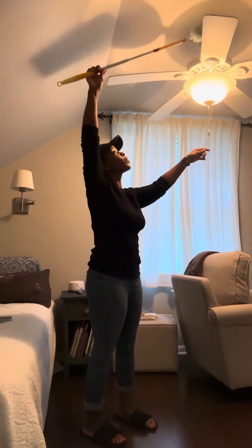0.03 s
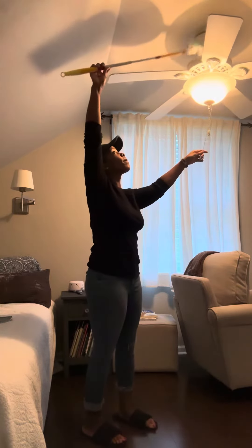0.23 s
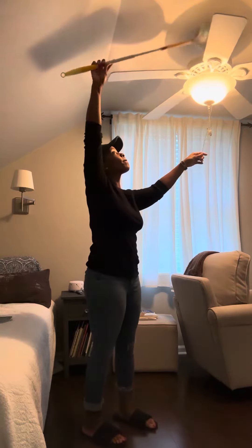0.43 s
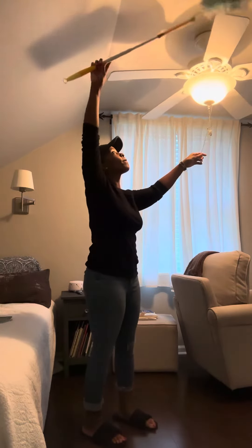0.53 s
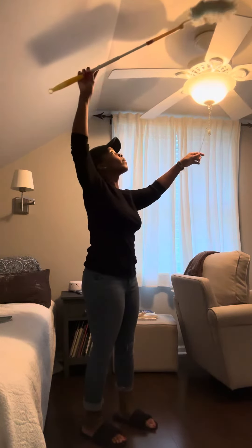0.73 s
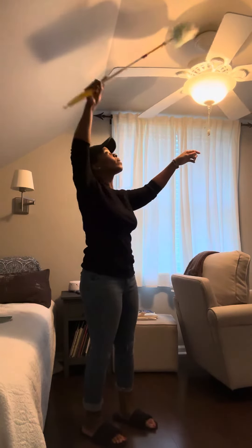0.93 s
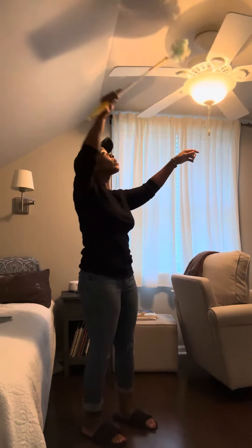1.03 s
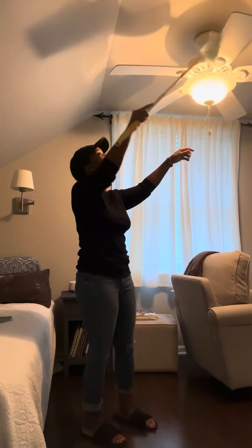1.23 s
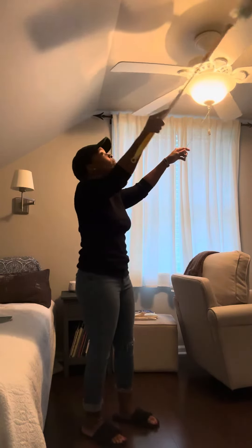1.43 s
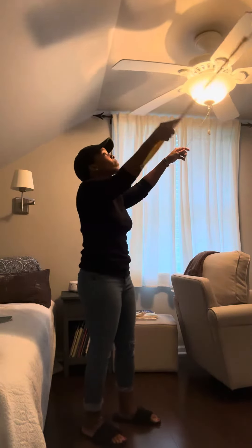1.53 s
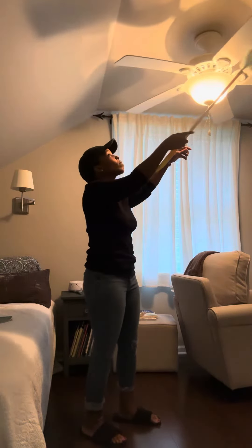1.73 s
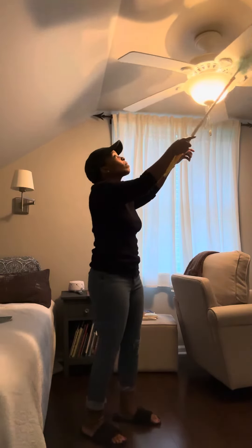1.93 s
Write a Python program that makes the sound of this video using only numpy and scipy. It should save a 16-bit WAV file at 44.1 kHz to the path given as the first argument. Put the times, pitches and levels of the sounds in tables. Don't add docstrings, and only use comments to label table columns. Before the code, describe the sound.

A hollow duster pole knocks fan blades twice early, the second a longer rattle, then a lighter tap and a late dull knock; soft brushing and ticks between, low air hum, small furnished room, stereo microphone.

```python
import sys
import numpy as np
from scipy import signal
from scipy.fft import rfft, irfft
from scipy.io import wavfile
from scipy.ndimage import uniform_filter1d

SR = 44100
rng = np.random.default_rng(int(sys.argv[2]) if len(sys.argv) > 2 else 0)


def wrap_up_sound(samples):
    columns = np.atleast_2d(samples).T
    tamed = np.clip(columns, -1, 1)
    steps = np.round(tamed * 32767).astype(np.int16)
    wavfile.write(sys.argv[1], SR, steps)


def voltage_ratio(level):
    return 10 ** (np.asarray(level, float) / 20)


N = 88200


def read(points, hz):
    f, value = np.transpose(points)
    return np.interp(np.log(hz + 1), np.log(f + 1), value)


def evened(x):
    return x / np.sqrt(np.mean(x ** 2) + 1e-20)


def colour(x, points):
    size = x.shape[-1]
    gain = voltage_ratio(read(points, np.fft.rfftfreq(size, 1 / SR)))
    return irfft(rfft(x) * gain, size)


def resonate(x, hz, width_hz):
    r = np.exp(-np.pi * width_hz / SR)
    return signal.lfilter([1 - r, 0, r - 1], [1, -2 * r * np.cos(2 * np.pi * hz / SR), r * r], x)


def resonate_twice(x, hz, width_hz):
    return resonate(resonate(x, hz, width_hz), hz, width_hz)


def add(mix, s, sound):
    part = mix[round(s * SR):][:len(sound)]
    part += sound[:len(part)]


def peaked(x, db):
    return x * voltage_ratio(db) / np.sqrt(uniform_filter1d(x ** 2, size=176).max() + 1e-20)


# (frequency [Hz], level [dB])
RUSH = [(12, -71), (20, -43.5), (48, -3.5), (124, -7), (248, -37.5), (272, -16.5), (527, -4.5), (552, 3.5),
        (800, -22.5), (1040, -43), (1760, -120)]
# (frequency [Hz], level [dB])
HISS = [(600, -5.5), (900, -0.5), (1300, -11.5), (2000, -6), (3000, -24.5), (6000, -32.5), (10000, -42),
        (16000, -43.5)]
# (frequency [Hz], width [Hz], level [dB])
DUCT = [(57.7, 31, -63), (98.8, 33, -63), (214.3, 43, -70.5), (271.4, 30, -68.5), (489.7, 33.5, -58),
        (565.4, 49, -59), (627.6, 91, -59)]
RUSH_DB, HISS_DB = -52.5, -64


def air_handling():
    rush, hiss, drive = rng.standard_normal((3, 2, N))
    air = voltage_ratio(RUSH_DB) * evened(colour(rush, RUSH)) + voltage_ratio(HISS_DB) * evened(colour(hiss, HISS))
    for hz, width_hz, db in DUCT:
        air += voltage_ratio(db) * evened(resonate_twice(drive, hz, width_hz))
    return air


# (frequency [Hz], t60 [s])
ROOM_T60 = [(200, 0.39), (1000, 0.34), (2000, 0.3), (5000, 0.26), (12000, 0.2)]
# (delay [s], level [dB])
ECHOES = [(.008, -8), (0.0117, -13), (.015, -12)]
ROOM_DB = -4
TAP_SPACING = 20
SCATTER = 300


def room(x):
    taps = np.zeros((2, SR // 2))
    slots = np.arange(200, SR // 2 - TAP_SPACING, TAP_SPACING)
    at = slots + rng.integers(0, TAP_SPACING, (2, len(slots)))
    np.put_along_axis(taps, at, rng.choice([-1., 1.], at.shape), 1)
    hz, t, z = signal.stft(taps, SR, nperseg=256)
    decay = voltage_ratio(-60 * t / read(ROOM_T60, hz)[:, None])
    tail = signal.istft(z * decay, SR, nperseg=256)[1]
    tail = voltage_ratio(ROOM_DB) * tail / np.linalg.norm(tail[0])
    tail[0, 0] += 1
    tail[1, :SCATTER] += rng.standard_normal(SCATTER) / np.sqrt(SCATTER)
    for s, db in ECHOES:
        tail[0, round(s * SR)] += voltage_ratio(db)
    fade_out = np.minimum(np.arange(N, 0, -1) / SCATTER, 1)
    return signal.fftconvolve(x[None], tail, axes=1)[:, :N] * fade_out


# (time [s], pressure level [dB], fine over coarse fibres [dB])
STROKE = [(0.199, -100, 13.5), (.27, -60, -4), (.33, -57, -2.5), (0.402, -57, -3), (0.581, -68.5, -22.5),
          (.68, -71, -10), (.85, -100, -4), (1.1, -82, -1), (1.17, -66.5, -2.5), (1.27, -67.5, 4.5),
          (1.31, -63, -1.5), (1.38, -66, -3.5), (1.44, -66.5, -4.5), (1.51, -66, -7), (1.56, -73.5, -19),
          (1.62, -71, 3), (1.679, -85, -4), (2.0, -79, 2)]
# (frequency [Hz], level [dB])
COARSE = [(800, -16.5), (1500, -1.5), (2200, 5.5), (3200, -1), (4500, -3.5), (7000, -32)]
# (frequency [Hz], level [dB])
FINE = [(2500, -10), (4200, 0), (5600, 7), (7000, 3), (10000, 0), (13500, -7), (16000, 4.5)]
SLIPS_PER_S, SLIP_SPREAD_DB = 18000, 0.5
CLUMP_DB, CLUMP_S = 3, 0.011


def brush():
    s, pressure_db, fine_db = np.transpose(STROKE)
    t, clump = np.arange(N) / SR, round(CLUMP_S * SR)
    slips = (rng.random((2, N)) < SLIPS_PER_S / SR) * rng.choice([-1., 1.], (2, N))
    slips = slips * voltage_ratio(SLIP_SPREAD_DB * rng.exponential(1, (2, N)))
    drift = uniform_filter1d(uniform_filter1d(rng.standard_normal((2, N)), clump), clump)
    clumps = voltage_ratio(CLUMP_DB * evened(drift))
    coarse = evened(colour(slips[0], COARSE)) * clumps[0]
    fine = evened(colour(slips[1], FINE)) * clumps[1]
    fibres = coarse + fine * voltage_ratio(np.interp(t, s, fine_db))
    return fibres * voltage_ratio(np.interp(t, s, pressure_db) - 4)


# (time [s], level [dB], frequency [Hz], width [Hz], length [s])
TICKS = [(.6065, -48, 5900, 756, 0.0031), (.606, -56, 4240, 2010, 0.0038),
         (.606, -64.5, 11500, 5700, 0.0024), (.606, -61, 14800, 2500, .004), (0.5, -64, 2264, 29, 0.0028),
         (0.416, -44, 4800, 3200, .003), (.44, -40.5, 2160, 44, 0.0033), (1.105, -49, 2223, 885, 0.0036),
         (1.105, -55, 3320, 1500, 0.0054), (1.108, -51.5, 8660, 2019, 0.0037),
         (1.104, -58.5, 14400, 4030, .004), (.49, -57, 2132, 29.7, 0.038),
         (.609, -71.5, 12600, 5960, 0.017), (.612, -66.5, 5640, 1520, .03),
         (.725, -73.5, 11500, 4000, 0.028), (.73, -58.5, 3570, 2480, .045),
         (1.108, -71.5, 10200, 6000, 0.036), (1.108, -67, 3000, 1500, 0.027), (1.175, -68, 5470, 1000, .05),
         (1.257, -67, 5300, 1010, 0.04), (1.365, -61, 2340, 1390, 0.035), (1.49, -62, 2570, 1600, 0.034),
         (1, -70, 3200, 2500, 0.0044), (1.1, -63, 5330, 2200, .004), (1.585, -71.5, 11200, 4980, 0.048),
         (1.62, -65.5, 12000, 6000, 0.0027), (1.812, -74, 5800, 2700, 0.018),
         (1.875, -80.5, 5800, 1560, 0.028)]


def ticks():
    out, t = np.zeros(N), np.arange(9000) / SR
    for s, db, hz, width_hz, length_s in TICKS:
        burst = rng.standard_normal(len(t)) * t / length_s * np.exp(-3 * t / length_s)
        add(out, s, peaked(resonate_twice(burst, hz, width_hz), db))
    return out


# (time [s], level [dB], frequency [Hz])
THUDS = [
    (.724, -46.5, 205),
    (1.575, -39.5, 195),
    (1.575, -41.5, 95.6),
    (0.49, -41, 520),
    (0.29, -45, 22),
    (0.27, -49, 112),
    (.232, -55, 620),
    (.232, -52, 400),
    (0.48, -48.5, 399),
    (.447, -47, 900),
]
THUD_T60_S, THUD_RISE_S = 0.18, 0.0046
THUD_WIDTH_HZ, THUD_NOISE = 72, 0.43


def thuds():
    out, t = np.zeros(N), np.arange(12000) / SR
    for s, db, hz in THUDS:
        fuzz = evened(resonate_twice(rng.standard_normal(len(t)), hz, THUD_WIDTH_HZ))
        flex = np.sin(2 * np.pi * hz * t) + THUD_NOISE * fuzz
        add(out, s, voltage_ratio(db - 60 * t / THUD_T60_S) * np.minimum(t / THUD_RISE_S, 1) * flex)
    return out


# (frequency [Hz], level [dB], t60 [s])
BLADE = [(388, -2.5, 0.086), (611, 2.5, 0.049), (882.7, -6, 0.11), (1067, -4, 0.022), (1443, -7, 0.12),
         (1908, 0.5, 0.026), (2160, 3.5, 0.1), (2555, -2, 0.041), (3017, -2.5, 0.051), (3174, -4.5, 0.0805),
         (3620, -18, .05), (3830, -5, 0.063), (4780, -18, 0.054), (5800, -14, 0.026)]
# (frequency [Hz], level [dB])
RATTLE = [(200, -25), (500, -5.5), (2200, -2), (3500, -2), (4500, -7), (5700, -7.5), (7500, -12.5),
          (15000, -30)]
# (time [s], level [dB], body below the pole [dB], brightness [dB/octave], t60 [s])
CLATTERS = [
    (.226, -36.5, 1, -2.5, 0.066),
    (.417, -33.5, -29, -1.5, 0.16),
    (.428, -32, -9.5, 1.5, 0.099),
    (.443, -32, -6, 1, 0.074),
    (.459, -34.5, -4.5, -0.5, 0.084),
    (.714, -55, -4, -4, 0.11),
    (.722, -41, -12, -3.5, 0.045),
    (1.565, -53.5, -7, -13, 0.09),
    (1.572, -41.5, -6, -8.5, 0.11),
]
BLADE_DB, CLATTER_RISE_S, SPLIT_HZ = -3.5, 0.0025, 1750
RATTLES_PER_S, RATTLE_DB = 1600, 1.5


def clatter():
    out, t = np.zeros(N), np.arange(12000) / SR
    octave = np.log2((np.fft.rfftfreq(len(t), 1 / SR) + 1) / SPLIT_HZ)
    for s, db, body_db, bright_db, t60_s in CLATTERS:
        contacts = rng.random(len(t)) < RATTLES_PER_S / SR
        rattle = 1 + voltage_ratio(RATTLE_DB) * signal.lfilter([1], [1, -.9], contacts)
        envelope = np.minimum(t / CLATTER_RISE_S, 1) ** 2 * voltage_ratio(-60 * t / t60_s)
        rub = (rng.random(len(t)) - .5) * rattle * envelope
        rings = np.zeros(len(t))
        for hz, mode_db, ring_s in BLADE:
            rings += voltage_ratio(mode_db) * resonate(rub, hz, 2.8 / ring_s) * np.sqrt(ring_s)
        mix = evened(colour(rub, RATTLE)) + voltage_ratio(BLADE_DB) * evened(rings)
        tilt = voltage_ratio(body_db * np.clip(-2 * octave, 0, 1) + bright_db * np.maximum(octave, 0))
        tilted = irfft(rfft(mix) * tilt, len(t))
        add(out, s, peaked(tilted[:len(t) * 2 // 3], db))
    return out


# (time [s], level [dB], frequency [Hz], contact [s])
PIPS = [(0.2273, -36.5, 1930, 0.0061), (.23, -31, 2293, 0.0053), (.421, -29, 1958, 0.0089),
        (.426, -24.5, 1923, 0.0087), (.442, -29.5, 2160, 0.008), (.449, -37, 2070, 0.0028),
        (.459, -33.5, 2180, 0.0062), (.474, -41, 2063, 0.019), (.723, -35, 1971, 0.0064),
        (1.5745, -25, 2012, 0.0049), (1.584, -56, 2120, 0.0068), (1.589, -52, 1960, 0.0047)]
# (centre time [s], level [dB], frequency [Hz])
PINGS = [(.2285, -50, 5190), (.2315, -43, 3580), (.238, -45, 3940), (.2434, -38.5, 2280),
         (.2484, -41, 2055), (.2539, -49, 2250), (.4205, -39, 3830), (.4205, -43, 5120),
         (.421, -39.5, 5700), (0.4232, -36, 3000), (0.427, -38, 3750), (.429, -47, 5730),
         (.431, -35.5, 3226), (.4335, -41.5, 4860), (.435, -35, 3760), (0.4381, -36, 3150),
         (0.4382, -37, 2020), (.44, -41.5, 4870), (0.4404, -40.5, 5300), (.4464, -40, 4180),
         (.4464, -37, 3570), (.448, -44, 4840), (0.451, -32.5, 2830), (0.4493, -42, 5820),
         (0.4536, -41, 4890), (.456, -45, 3860), (.46, -41.5, 5430), (.463, -37, 2740), (.464, -41, 1440),
         (.45, -42.5, 1465), (.483, -37.5, 2075), (.725, -43, 5670), (.725, -54, 3990), (.727, -47.5, 3344),
         (.7365, -47.5, 2063), (1.5777, -55, 4020), (1.5795, -49.5, 3310), (1.579, -46, 2630),
         (1.587, -46, 2086), (1.607, -52, 2040), (1.6264, -51, 2160)]
PING_S, POLE_WIDTH_HZ = 0.007, 620


def pole_pips():
    out, t = np.zeros(N), np.arange(2000) / SR
    pings = [(s - PING_S / 2, db, hz, PING_S) for s, db, hz in PINGS]
    for s, db, hz, contact_s in list(PIPS) + pings:
        push = np.sin(np.pi * np.minimum(t / contact_s, 1)) ** 1.46
        drive = push * (np.sin(2 * np.pi * hz * t) + 0.089 * rng.standard_normal(len(t)))
        add(out, s, peaked(resonate(drive, hz, POLE_WIDTH_HZ), db))
    return out


# (frequency [Hz], likeness [0-1])
LIKENESS = [(50, .999), (250, 0.92), (500, 0.92), (2000, 0.43), (4500, 0.2), (6900, 0.96), (13500, 0.9),
            (16000, 0.94)]
# (frequency [Hz], gap [turns])
GAP = [(0, 0), (4000, .05), (6200, .3), (7000, .497), (8900, .503), (10300, .99), (13100, 1.01),
       (14600, 1.49)]
# (frequency [Hz], left over right [dB])
LEAN = [(300, 0), (800, -2), (1300, -6), (2400, -0.8), (5000, 0), (8000, 2.5)]


def two_ports(shared, unlike):
    hz = np.fft.rfftfreq(N, 1 / SR)
    same = np.clip(read(LIKENESS, hz), 0, 1)
    mid = np.sqrt((1 + same) / 2) * rfft(shared)
    side = np.sqrt((1 - same) / 2) * rfft(unlike) * 1j
    half_gap = np.exp(1j * np.pi * np.interp(hz, *np.transpose(GAP)))
    half_lean = voltage_ratio(read(LEAN, hz) / 2)
    left = (mid + side) * half_gap * half_lean
    right = (mid - side) / half_gap / half_lean
    return irfft(np.array([left, right]), N)


POLE_DRY_DB, TICK_DRY_DB = 9, 5


def scene():
    pole = (pole_pips() + thuds()) / voltage_ratio(POLE_DRY_DB)
    head = ticks() / voltage_ratio(TICK_DRY_DB)
    field = room(pole + clatter() + head + brush()) + air_handling()
    extra_direct = pole * (voltage_ratio(POLE_DRY_DB) - 1) + head * (voltage_ratio(TICK_DRY_DB) - 1)
    return two_ports(field[0] + extra_direct, field[1])


def roll_off(x):
    return signal.sosfilt(signal.butter(12, 15630, fs=SR, output="sos"), x)


def record(dry):
    return roll_off(dry)


dry = scene()
out = record(dry)
wrap_up_sound(out)
```